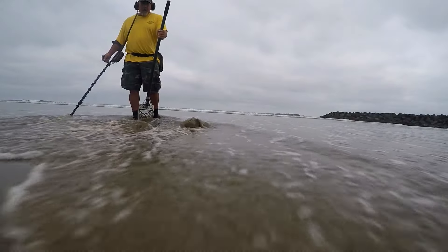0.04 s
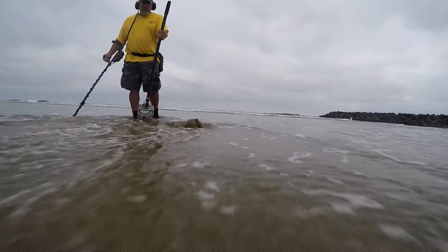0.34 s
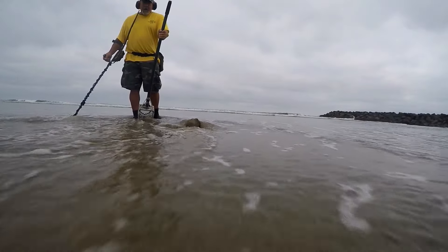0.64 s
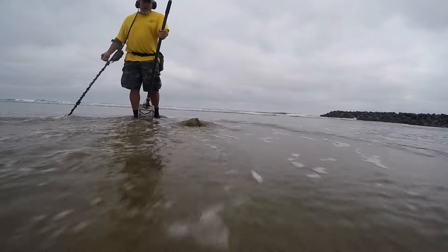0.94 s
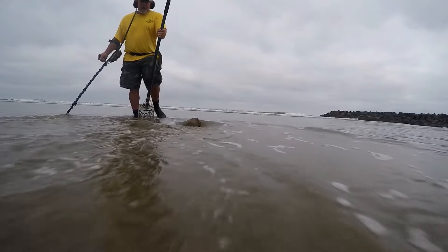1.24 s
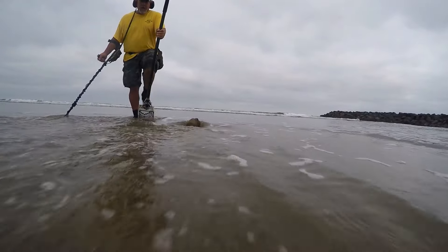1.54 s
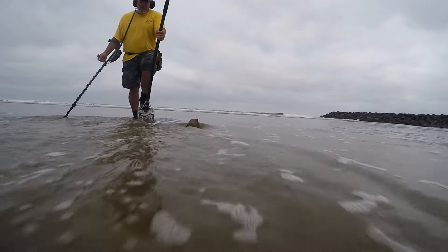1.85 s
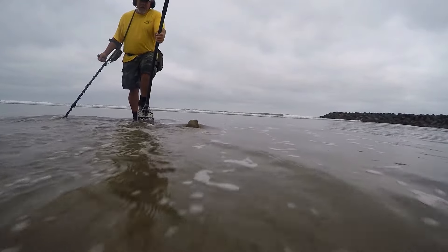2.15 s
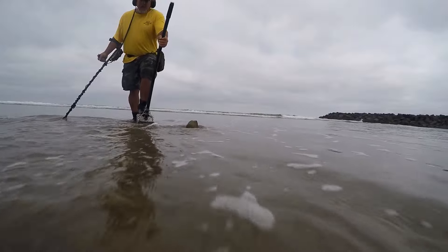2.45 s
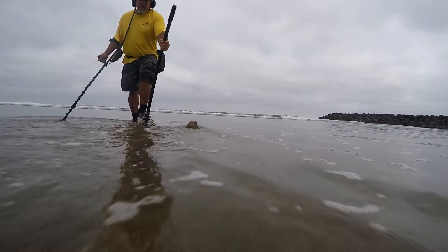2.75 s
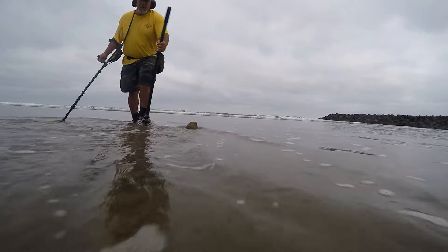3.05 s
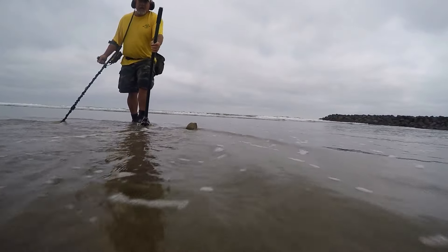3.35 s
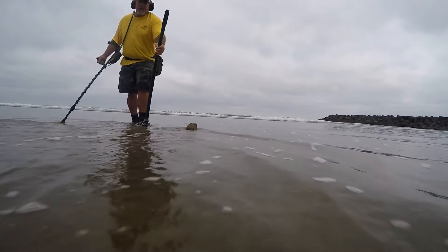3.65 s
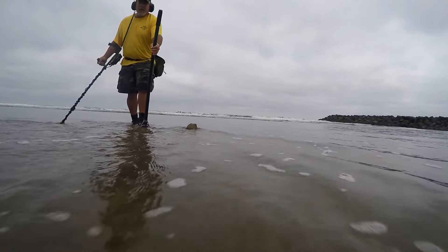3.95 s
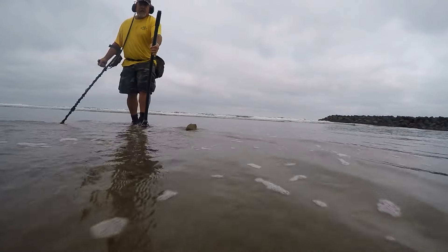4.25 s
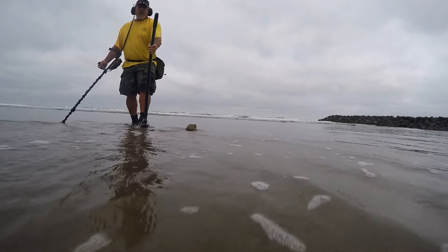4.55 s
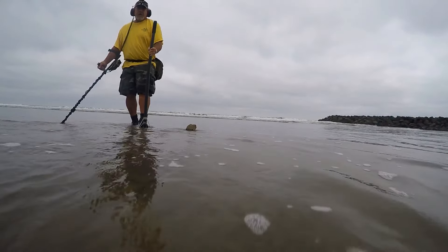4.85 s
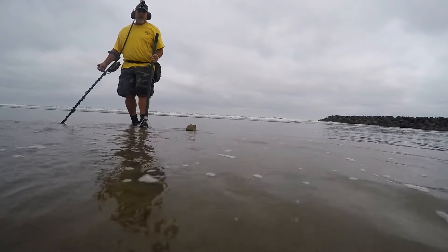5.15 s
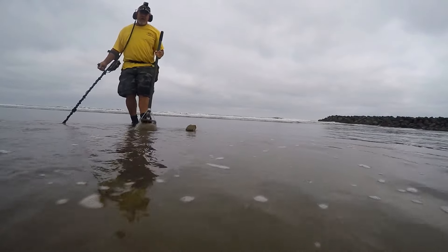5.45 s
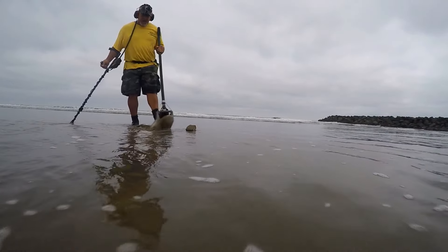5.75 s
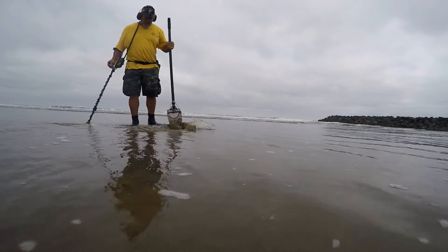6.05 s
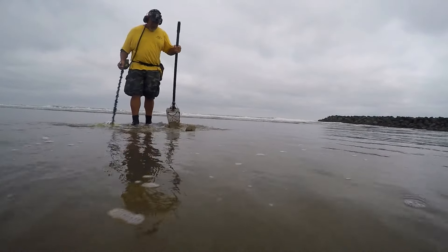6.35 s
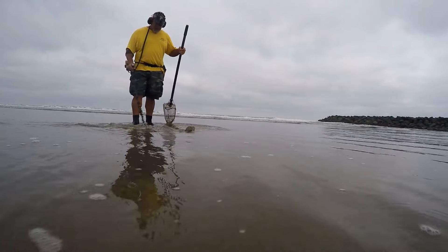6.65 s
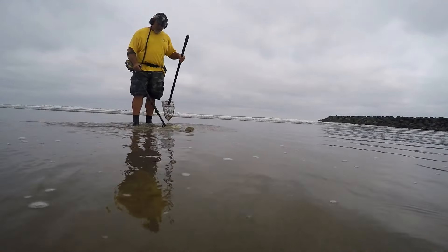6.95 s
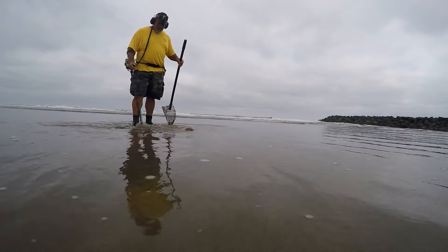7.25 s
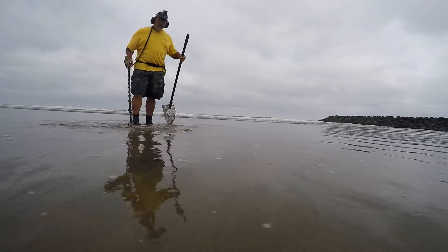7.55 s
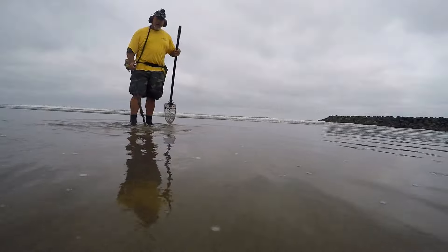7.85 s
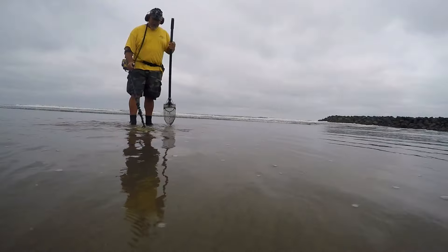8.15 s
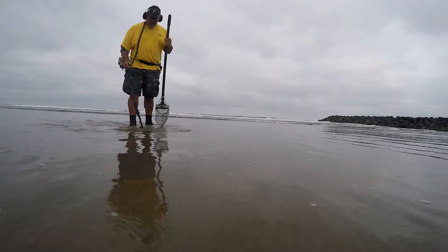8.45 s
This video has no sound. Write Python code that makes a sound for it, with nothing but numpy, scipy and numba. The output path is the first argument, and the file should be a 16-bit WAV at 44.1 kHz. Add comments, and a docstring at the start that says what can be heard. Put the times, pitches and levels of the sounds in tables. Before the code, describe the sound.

Heard from inside a waterproof case on wet sand, shallow seawater rushes in suddenly, bubbling and foaming with a slightly hollow ring. A single loud pop stands out as the wash weakens, followed by a few small laps. Once the water has drained, quiet dribbling from a scoop and light splashes of feet come from nearby, over a soft, steady hiss of faraway waves.

```python
"""A wave washes round a camera

A thin wave runs up a beach and round a waterproof camera standing on the sand. Bubbles gurgle and
fizz against its case, one bursts loudly right on it, and the flow slowly dies away. What stays is
the hiss of distant surf and the small splashes of someone wading with a sand scoop."""
import sys
import numpy as np
from scipy import signal
from scipy.fft import rfft, irfft
from scipy.io import wavfile
from scipy.ndimage import uniform_filter1d, minimum_filter1d
from numba import njit

SR = 44100
rng = np.random.default_rng(int(sys.argv[2]) if len(sys.argv) > 2 else 0)


def put_to_file(sound):
    """Save the sound as 16-bit audio at rate SR, in the file named by the first command-line argument."""
    columns = np.atleast_2d(sound).T  # one column per channel
    safe = np.clip(columns, -1, 1)
    whole_steps = np.round(safe * 32767)
    wavfile.write(sys.argv[1], SR, whole_steps.astype(np.int16))


N = 379260
TIME = np.arange(N) / SR
BINS = np.fft.rfftfreq(4096, 1 / SR)
ARRIVE_S, RISE_S = .047, .016  # when the wave arrives, and how quickly it builds


# How strong the gurgle is from low to high pitch: f/Hz, level/dB (all table levels are relative)
GURGLE_TONE = [(120, -32), (300, -11.5), (390, -16.5), (560, -7), (1000, 0), (1370, -1), (1600, 0.5),
               (2080, 0.5), (2320, -11.5), (2650, -9), (3300, -53)]
# The same for the fizz: f/Hz, level/dB
FIZZ_TONE = [(1800, -19.5), (2500, 0), (2850, 8), (3080, -1.5), (4200, 1.5), (5000, -6.5), (6200, -16),
             (7400, -17), (8100, -31), (8600, -32.5), (11000, -30.5), (12000, -39), (15000, -48)]

def wash():
    """Large bubbles gurgle, small ones fizz and foam ticks; all surge together with each ripple."""
    ripple = wander(rate=45)
    slosh = rng.standard_normal(N) * gain_of(1.15 * wander(rate=290))
    churn = cloud(low_hz=396.1, high_hz=3062, cycles=36.7, spread_db=0.66, glide=0.1, count=14000)
    churn += gain_of(4.0) * slosh
    foam = cloud(low_hz=2230, high_hz=12100, cycles=71, spread_db=4.5, glide=0.094, count=16000)
    ticks = cloud(low_hz=2940, high_hz=13800, cycles=6.1, spread_db=5, glide=0.11, count=1400)
    seethe = rng.standard_normal(N) * gain_of(2.0 * wander(rate=77))
    foam = foam + gain_of(-9.0) * ticks + gain_of(1.5) * seethe
    surge = ripple * (1 + 0.25 * follow(SHALLOWNESS))  # shallow water laps more unevenly
    gurgle = through_case(churn * gain_of(1.4 * surge), GURGLE_TONE) * gain_of(flow_db() - 1.12)
    fizz = through_case(foam * gain_of(2.23 * surge), FIZZ_TONE) * gain_of(fizz_db())
    return gurgle + fizz


# How strongly the water flows past: t/s, level/dB
FLOW_STRENGTH = [(.1, -29.5), (.45, -27), (.68, -25.5), (1.25, -25.8), (1.62, -29.5), (2.05, -31),
                 (2.5, -28.5), (2.93, -30.5), (3.06, -35), (3.5, -36.5), (3.8, -41), (4.17, -41),
                 (4.28, -47.5), (4.5, -44), (5.35, -53.5), (5.6, -59.5), (8.6, -74)]

def flow_db():
    """The wave arrives all at once, then drains away."""
    return follow(FLOW_STRENGTH) - 45 * np.exp(-since_arrival() / RISE_S)


def front(clear_s=0.7):
    """How much of the wave's foamy front is still round the case, from 1 to 0."""
    return np.exp(-since_arrival() / clear_s)


def fizz_db():
    """The fizz follows the flow and is strongest in the foamy front."""
    return flow_db() - 12.5 + 13.5 * front()


# Pitches at which the case rings: f/Hz, width/Hz, boost in deep water/dB, boost in shallow water/dB
CASE_RINGS = [(730, 102, -1, 9.5), (1270, 180, -2, 3.5), (1854, 127, 0.5, 8.5), (3340, 390, 2, 10),
              (3705, 110, 8.5, 9.5), (4600, 110, 1, 1), (5570, 94, -4, 12), (9300, 490, 11, 10),
              (10000, 630, 11, 9.5)]
DEEP_RINGS = [(hz, width, db) for hz, width, db, _ in CASE_RINGS]
SHALLOW_RINGS = [(hz, width, db) for hz, width, _, db in CASE_RINGS]
# The water drops: t/s, share of the shallow sound
SHALLOWNESS = [(1.5, 0.089), (3.7, 1)]

def through_case(x, tone):
    """The case colours the water sound, and rings more as the water drops."""
    deep = evened(colour(x, tone, DEEP_RINGS))
    shallow = evened(colour(x, tone, SHALLOW_RINGS))
    share = follow(SHALLOWNESS)
    return evened((1 - share) * deep + share * shallow)


# The pop's ringing tones, plus the harsh overtones of an overloaded microphone (4200 and 5590 Hz):
# f/Hz, level/dB, t60/s (t60 is the time to fade by 60 dB)
POP_AND_OVERLOAD = [(1460, 0, .033), (1490, -6.5, .002), (800, -15, .028), (2130, -21, .025),
                    (4200, -30, .009), (5590, -29, .011), (7700, -42, .008), (130, -28, .06),
                    (480, -33, .03)]

def pop(at_s=2.6866, level_db=-4.7, swell_s=.0009, hold_s=.0029):
    """One big bubble bursts on the case: a loud, pitched click, with overtones added for overload."""
    t, out = np.arange(4000) / SR, np.zeros(N)
    swell = 1 - np.exp(-(t / swell_s) ** 2)
    dying = np.maximum(t - hold_s, 0)
    tone = sum(gain_of(db - 60 * dying / t60) * np.sin(2 * np.pi * hz * t)
               for hz, db, t60 in POP_AND_OVERLOAD)
    snap = gain_of(-32 - 60 * t / .012) * rng.standard_normal(len(t))
    add(out, at_s, gain_of(level_db) * swell * (tone + snap))
    return out


# The largest bubbles close by: t/s, f/Hz, level/dB, t60/s
BIG_BUBBLES = [(.0846, 1600, -22, 0.05), (.1362, 1840, -7.5, 0.013), (.1738, 1820, -13.5, 0.043),
               (.195, 2800, -16, 0.03), (.1955, 1990, -12, 0.019), (.2627, 3780, -15, .015),
               (.3085, 4800, -14, 0.0047), (.322, 1552, -15.5, 0.033), (.326, 3740, -6, .0077),
               (.333, 5320, -12.5, 0.0046), (.3451, 4500, -17.5, .027), (.4728, 1600, -20, 0.033),
               (.476, 2470, -11.5, 0.0088), (.6415, 1120, -13, 0.039), (.6625, 1034, -16, 0.04),
               (.7862, 2610, -20, 0.031), (.8217, 1004, -16.5, 0.024), (.906, 1714, -11, 0.023),
               (.9236, 6120, -20.5, 0.0072), (1.2008, 1010, -18.5, 0.034), (1.204, 2100, -19.5, 0.039),
               (1.425, 4220, -21, 0.022), (1.6673, 1860, -14.5, 0.016), (1.6944, 1525, -18, 0.034),
               (2.0365, 1446, -23.5, 0.041), (2.126, 1700, -18, 0.017), (2.1777, 2010, -19, 0.026),
               (2.213, 3870, -23, 0.01), (2.388, 4800, -27, 0.015), (2.4594, 1500, -16.5, 0.039),
               (2.4782, 1910, -15, 0.024), (2.7387, 3050, -17.5, 0.0076), (2.7926, 3370, -22, 0.0086),
               (2.7945, 1780, -11, 0.012), (2.871, 1000, -18, 0.041), (2.9422, 1040, -23, 0.052),
               (2.9434, 2680, -22, .031), (2.9597, 1233, -19, 0.038), (3.03, 2700, -29, .034),
               (3.1645, 1776, -23.5, 0.055), (3.9127, 1786, -26.5, 0.063), (4.437, 1950, -24.5, 0.0098),
               (4.4612, 900, -31.5, .037)]

def near_bubbles(glide=.11, loudest_at=.2):
    """Bubbles ring right at the wall of the case, each with a faint wet spatter."""
    s, hz, db, t60 = np.vstack([BIG_BUBBLES, small_bubbles(count=44)]).T
    start_hz = hz / (1 + glide * loudest_at)  # slides up to the listed pitch by its loudest moment
    tones = ring(s, start_hz, gain_of(db + 9), t60, glide, 0.07)
    spatter = abs(signal.hilbert(tones)) * rng.standard_normal(N)  # noise as loud as the tones
    spatter = colour(spatter, [(400, -32.5), (900, 12.5), (4500, 0.5), (7000, -28), (12000, -39)])
    return tones + gain_of(-13) * spatter


def small_bubbles(count, mean_delay_s=1.0, low_hz=2430, high_hz=5250, scatter_db=7, cycles=48):
    """Small bubbles crowd behind the front, then thin out. Gives rows of t/s, f/Hz, level/dB, t60/s."""
    when, pitch, near = rng.random((count, 3)).T
    s = ARRIVE_S + RISE_S - mean_delay_s * np.log(1 - (np.arange(count) + when) / count)
    hz = low_hz * (high_hz / low_hz) ** pitch
    db = np.interp(s, TIME, fizz_db()) + 10 + scatter_db * (2 * near - 1)
    db += 0.5 * np.log2(hz / low_hz)  # higher ones are slightly louder
    return np.transpose([s, hz, db, cycles / hz])


# The strongest ripples hitting the case: t/s, level/dB, t60/s
RIPPLE_SLAPS = [(.052, -30, 0.033), (.0605, -22, 0.019), (.1935, -19, 0.025), (.3235, -16, .022),
                (1.666, -26, .016), (1.693, -19.5, 0.047), (2.126, -17, 0.0056), (2.459, -19.5, .038),
                (2.793, -18.5, 0.02), (3.324, -19.5, 0.017), (3.368, -19, 0.012), (3.739, -26.5, .03),
                (4.226, -31, 0.077), (4.325, -32.5, 0.051), (4.436, -32, 0.03), (4.654, -29.5, 0.034),
                (4.765, -37, 0.067)]
# The bright tone of snapping foam and spray: f/Hz, level/dB
SNAP_TONE = [(2000, -29), (4500, -7), (7400, 8.5), (8400, -8.5), (10500, -13.5), (11800, -17), (15000, -22)]

def slaps_and_snaps():
    """Ripples slap the case and flecks of foam snap on it; both make it ring."""
    return case_hits(RIPPLE_SLAPS, GURGLE_TONE) + case_hits(foam_flecks(count=24), SNAP_TONE)


def foam_flecks(count, from_s=.3, to_s=3.2, scatter_db=9.5, fade_db_per_s=3.5, t60=0.0064):
    """Foam snaps at random moments, growing fainter. Gives rows of t/s, level/dB, t60/s."""
    when, near = rng.random((count, 2)).T
    after = (to_s - from_s) * (np.arange(count) + when) / count
    db = -33 - fade_db_per_s * after + scatter_db * (2 * near - 1)
    return np.transpose([from_s + after, db, np.full(count, t60)])


def case_hits(rows, tone):
    """Each hit is a short puff of noise, coloured by the ringing case."""
    t, out = np.arange(4000) / SR, np.zeros(N)
    noise = colour(rng.standard_normal(N), tone, SHALLOW_RINGS)
    for s, db, t60 in rows:
        shape = gain_of(db - 60 * t / t60) * (1 - np.exp(-20 * t / t60))
        puff = shape * noise[round(s * SR):][:len(t)]
        add(out, s, puff * np.linalg.norm(shape) / np.linalg.norm(puff))
    return out


def spray(level_db=-44.5, fade_db_per_s=13.5):
    """The front spatters the case with the finest bubbles, which ping and are soon gone."""
    pings = cloud(low_hz=4900, high_hz=15000, cycles=29, spread_db=4, glide=.05, count=5000)
    mist = evened(colour(pings, SNAP_TONE, DEEP_RINGS))
    after = since_arrival()
    return mist * (1 - np.exp(-after / RISE_S)) * gain_of(level_db - fade_db_per_s * after)


# The deep tone of water pushing on the case: f/Hz, level/dB
RUMBLE_TONE = [(15, -9.5), (40, 2), (80, -2.5), (120, -2), (175, 1.5), (215, -5.5), (270, -13.5),
               (380, -17.5), (700, -69)]

def rumble(level_db=-41.5, full_flow_db=-26.5, front_db=6.5):
    """The flow buffets the case, hardest as the front passes."""
    push = evened(colour(rng.standard_normal(N), RUMBLE_TONE))
    return push * gain_of(level_db + 0.7 * (flow_db() - full_flow_db) + front_db * front())


# Water spilling from the lifted scoop: t/s, level/dB
SPILL_LEVEL = [(5.1, -63), (5.5, -58), (5.92, -53), (6.24, -55.5), (6.4, -68), (7.3, -63), (7.6, -82)]
# The tone of that trickle: f/Hz, level/dB
SPILL_TONE = [(300, -11), (900, 3), (2000, 11), (3700, 8), (5000, 2.5), (8000, -7), (11000, -22),
              (15000, -29)]
# Splashes and knocks of feet and scoop: t/s, level/dB, middle f/Hz, width/octaves, t60/s
WADING_SPLASHES = [(5.418, -45, 1300, 1.2, .05), (5.744, -41.5, 1510, 2.3, 0.041),
                   (5.87, -44, 4940, .92, .04), (5.912, -45, 4700, 1.1, 0.045),
                   (5.973, -43, 1300, 2.4, 0.13), (6.017, -36.5, 1490, 2.5, 0.029),
                   (6.06, -44, 4970, .22, .032), (6.248, -42.5, 1600, 1, 0.063),
                   (6.667, -36, 1150, 0.81, 0.022), (6.668, -38, 3350, 0.51, 0.027),
                   (6.728, -48, 4200, 1.1, .04), (7.273, -40.5, 1200, 1.5, 0.022),
                   (7.295, -42, 2880, .22, .04)]

def wading(rise_s=0.00061):
    """A few steps away, water spills from the scoop and feet slap the shallows."""
    trickle = rng.standard_normal(N) * gain_of(2.8 * wander(rate=110))
    out = evened(colour(trickle, SPILL_TONE)) * gain_of(follow(SPILL_LEVEL))
    t = np.arange(6000) / SR
    for s, db, hz, octaves, t60 in WADING_SPLASHES:
        edge = 2 ** (octaves / 2)
        band = signal.butter(3, [hz / edge, hz * edge], "band", fs=SR, output="sos")
        shape = gain_of(db - 60 * t / t60) * (1 - np.exp(-t / rise_s))
        splash = shape * signal.sosfilt(band, rng.standard_normal(2 * len(t)))[len(t):]
        add(out, s, gain_of(-0.5) * splash * np.linalg.norm(shape) / np.linalg.norm(splash))
    return out


# The tone of the distant surf: f/Hz, level/dB
SURF_TONE = [(15, -8), (40, 5.5), (80, -5.5), (200, -6.5), (500, -10), (1050, -11.5), (1300, -12),
             (1620, -8), (2100, -3.5), (4100, -6.5), (5400, -18.5), (8400, -26), (11500, -32), (15000, -31)]
# Peaks and dips the case puts in it: f/Hz, width/Hz, boost/dB
SURF_RINGS = [(1830, 156, 7.5), (2580, 330, 3), (3000, 185, -6.5), (3540, 260, 4.5), (4400, 89, -16),
              (6150, 430, 4), (10100, 620, 1), (14400, 330, 5)]

def surf(level_db=-50):
    """Waves breaking far away merge into an even hiss."""
    hiss = evened(colour(rng.standard_normal(N), SURF_TONE, SURF_RINGS))
    return hiss * gain_of(level_db + 0.19 * wander(rate=6))


def cloud(low_hz, high_hz, cycles, spread_db, glide, count):
    """Many bubbles of all sizes at random times, most faint and a few near."""
    when, pitch, near, damping, sign = rng.random((count, 5)).T
    hz = low_hz * (high_hz / low_hz) ** pitch
    t60 = cycles / hz * 2 ** (2 * damping - 1)
    strength = gain_of(spread_db * np.minimum(-np.log(1 - near), 4))
    strength *= np.sqrt(hz / t60) * np.sign(sign - .5)  # keeps low and high pitches in balance
    return evened(ring(when * N / SR, hz, strength, t60, glide, 0.035))


@njit
def ring(start, hz, strength, t60, glide, swell_share):
    """Bubbles: pure tones that swell briefly, die away and rise in pitch as they near the surface."""
    out = np.zeros(N)
    for k in range(len(start)):
        first, n = int(start[k] * SR), max(int(t60[k] * SR), 8)
        step = np.exp(2j * np.pi * hz[k] / SR - np.log(1000) / n)  # turns and fades the tone
        bend = np.exp(2j * np.pi * hz[k] / SR * glide / n)  # nudges the pitch up
        tone, closed, opening = strength[k] + 0j, 1., np.exp(-1 / (swell_share * n))
        for i in range(max(first, 0), min(first + n, N)):
            out[i] += tone.imag * (1 - closed) ** 2
            tone *= step
            step *= bend
            closed *= opening
    return out


def colour(x, tone, peaks=()):
    """Filters a sound with a smooth tone curve that has peaks or dips on it."""
    hz, db = np.transpose(tone)
    curve = np.interp(np.log(BINS + 1), np.log(hz), db)
    curve += sum(boost * .5 ** ((2 * (BINS - f) / width) ** 2) for f, width, boost in peaks)
    log_gain = np.log(gain_of(np.concatenate([curve, curve[-2:0:-1]])))
    taps = np.fft.ifft(np.exp(np.conj(signal.hilbert(log_gain)))).real  # rings only after a sound
    return signal.oaconvolve(x, taps)[:N]


def wander(rate):
    """A random wobble of typical size 1, changing up to about `rate` times a second."""
    f = np.fft.rfftfreq(N, 1 / SR)
    return evened(irfft(rfft(rng.standard_normal(N)) * (f > 2) / (1 + (f / rate) ** 2), N))


def since_arrival():
    """Seconds since the wave arrived; 0 before that."""
    return np.maximum(TIME - ARRIVE_S, 0)


def follow(rows):
    """Joins (time, value) points with straight lines."""
    return np.interp(TIME, *np.transpose(rows))


def gain_of(db):
    """Turns decibels into a multiplier."""
    return 10 ** (np.asarray(db) / 20)


def evened(x):
    """Scales a signal to an average (rms) strength of 1."""
    return x / np.sqrt(np.mean(x ** 2) + 1e-20)


def add(mix, s, sound):
    """Mixes a sound in at `s` seconds."""
    part = mix[round(s * SR):][:len(sound)]
    part += sound[:len(part)]


def scene():
    """Near water over the far surf, in one channel."""
    return (wash() + spray() + rumble() + near_bubbles() + slaps_and_snaps()
            + pop() + wading() + surf())[None]


def record(dry):
    """A quick limiter turns down the loudest peaks, then the highest treble is cut."""
    ceiling, cutoff_hz = .87, 15100
    allowed = np.minimum(1, ceiling / (abs(dry) + 1e-9))
    held = dry * uniform_filter1d(minimum_filter1d(allowed, size=61), size=61)
    treble_cut = signal.firwin(601, cutoff_hz, window=("kaiser", 9), fs=SR)
    return signal.oaconvolve(held, treble_cut[None], "same")


dry = scene()
out = record(dry)
put_to_file(out)
```